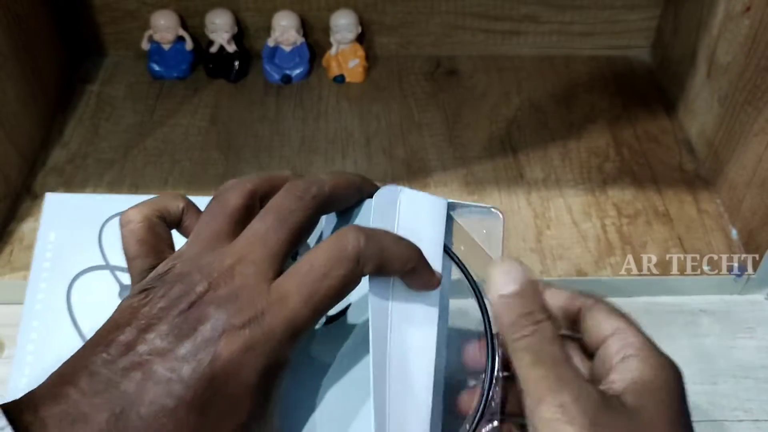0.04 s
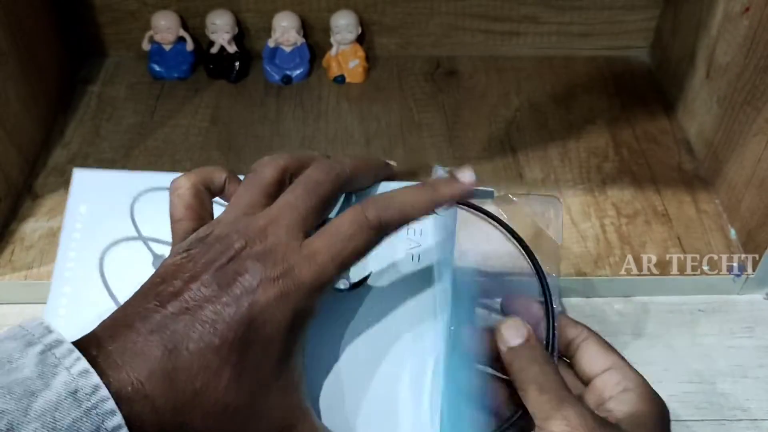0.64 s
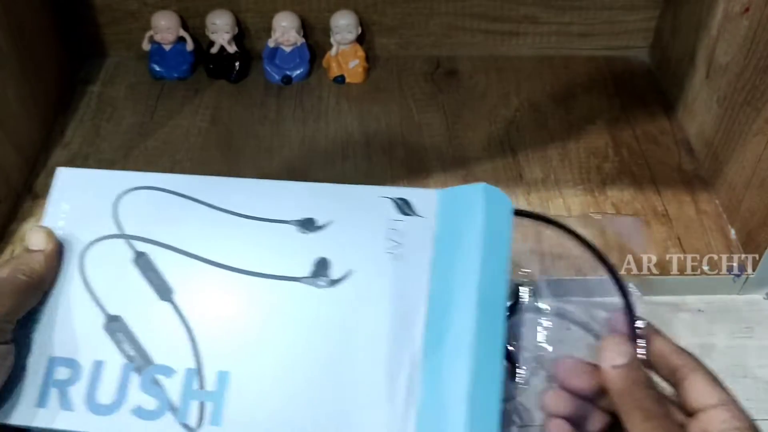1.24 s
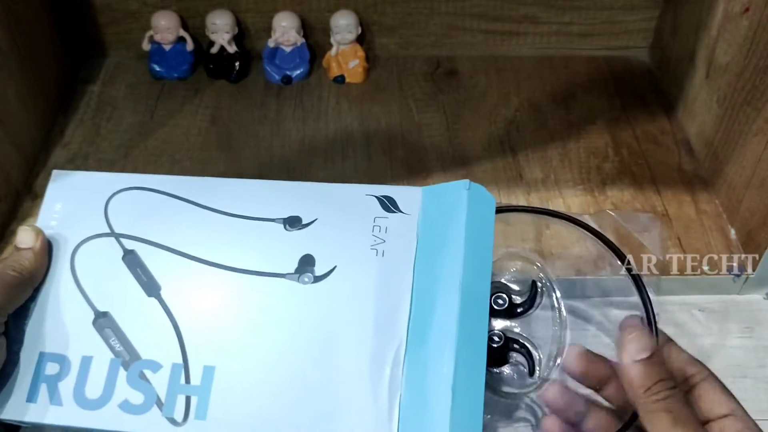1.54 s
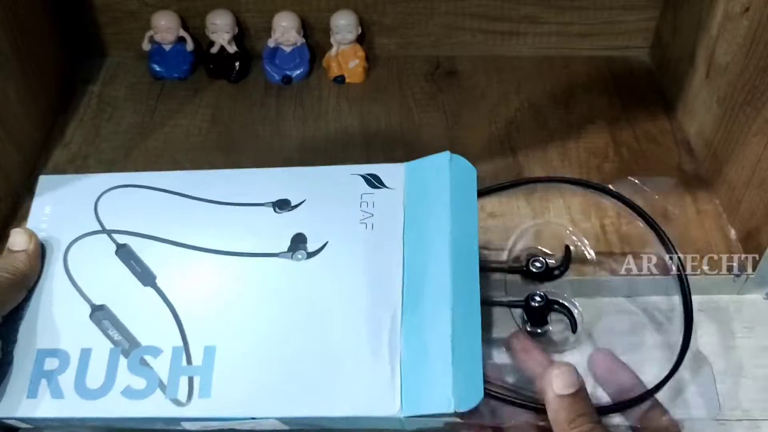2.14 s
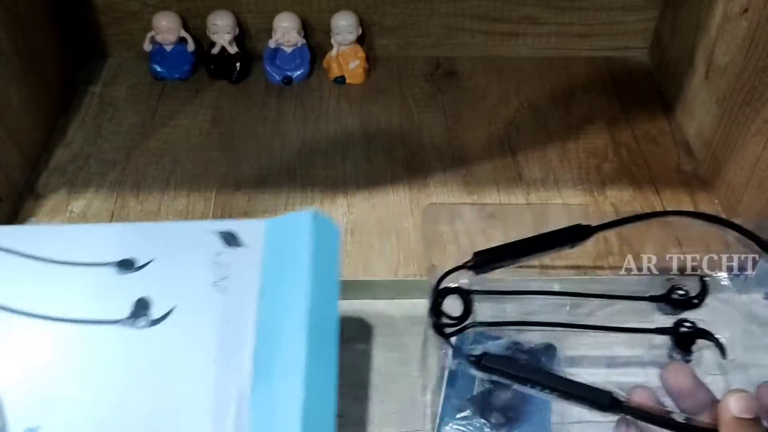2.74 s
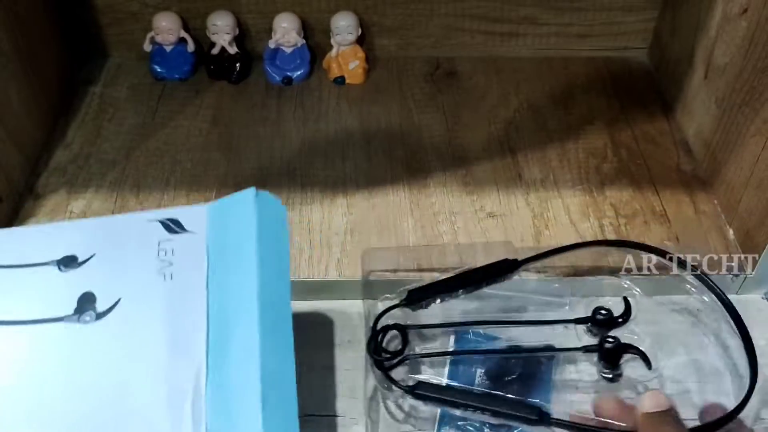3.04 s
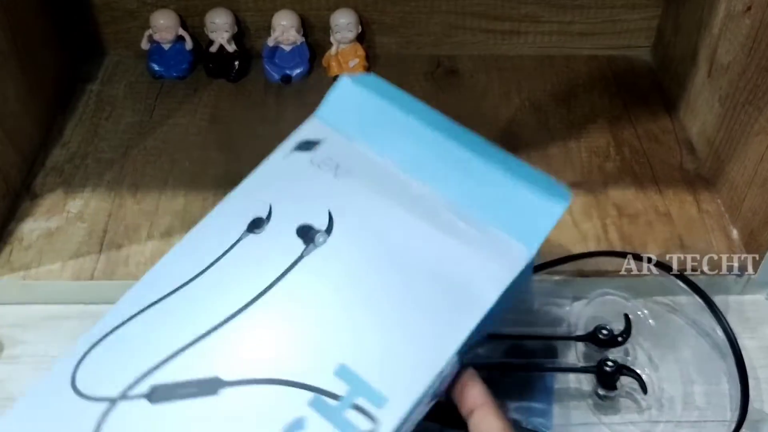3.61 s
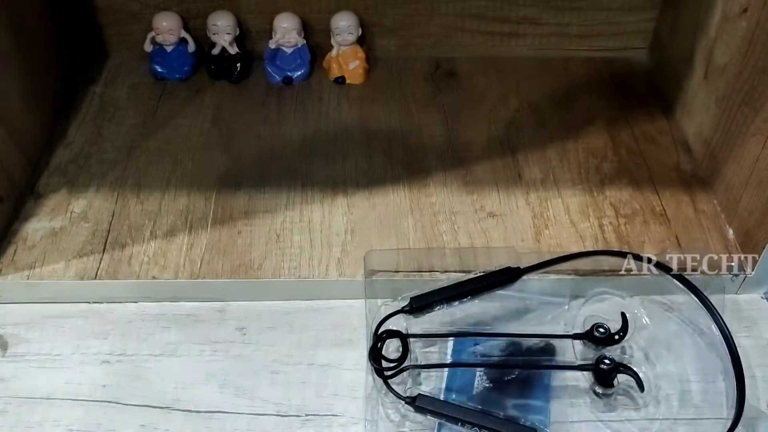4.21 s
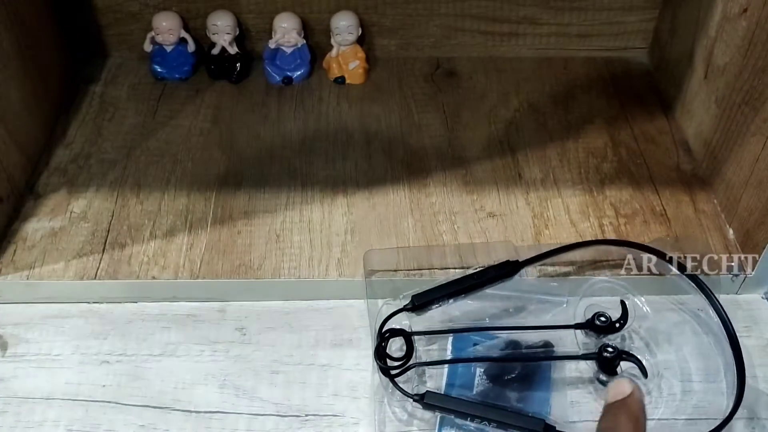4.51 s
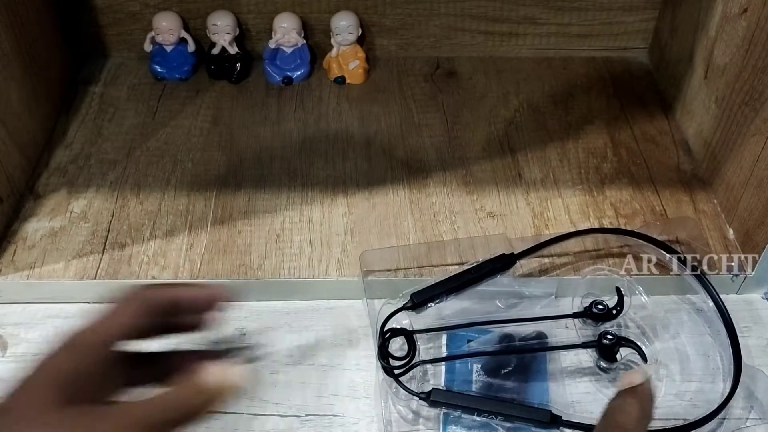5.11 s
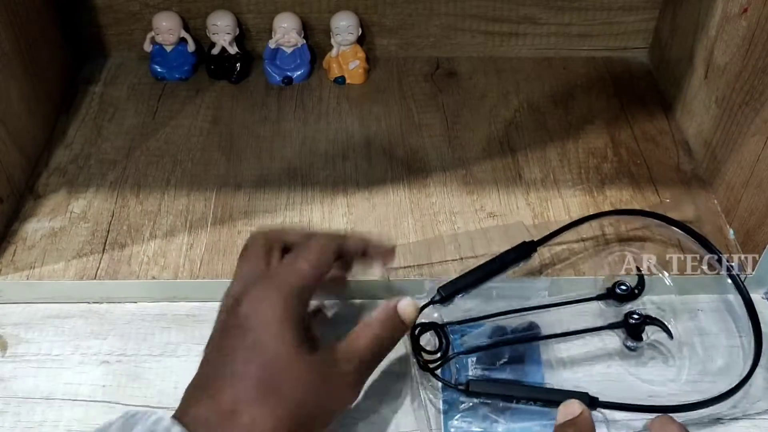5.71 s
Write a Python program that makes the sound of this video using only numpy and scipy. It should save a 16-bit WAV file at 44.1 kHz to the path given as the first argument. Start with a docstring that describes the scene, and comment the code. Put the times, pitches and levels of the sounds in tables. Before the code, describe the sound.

A thin plastic tray is pulled from a cardboard sleeve in short, rustling scrapes, snapping dryly as it buckles while the box bumps a wooden shelf. The box is put aside with a low boom, and a cluster of louder knocks and cracks follows. Then fingers shift the tray on the wood with duller scrapes and a few more knocks. Everything is close and slightly hollow, in a small quiet room.

```python
"""A thin plastic tray is pulled from a cardboard sleeve in a wooden alcove, close to a two-port microphone.
First its edges scrape in tiny slips, it buckles and snaps, and the box bumps the shelf.
At 2.5 s the box is put aside with a low boom; the strongest knocks and snaps follow at 3.0-3.3 s.
Then fingers shift the tray on the wood, with duller scrapes and a few more knocks.
Throughout, the alcove rings with hollow resonances; a small quiet room lies behind."""
import sys
import numpy as np
from scipy import signal
from scipy.fft import rfft, irfft, next_fast_len
from scipy.io import wavfile
from scipy.ndimage import uniform_filter1d

SR = 44100
rng = np.random.default_rng(int(sys.argv[2]) if len(sys.argv) > 2 else 0)


def transcribe(signal):
    """Save signal, clipped to [-1, 1], as a 16-bit WAV file at the path in sys.argv[1]."""
    frames = np.atleast_2d(signal).T
    limited = np.clip(frames, -1, 1)
    pcm = np.round(limited * 32767).astype(np.int16)
    wavfile.write(sys.argv[1], SR, pcm)


N = 258063
TIME_S = np.arange(N) / SR
FREQS_HZ = np.fft.rfftfreq(8192, 1 / SR)

# Sliding strokes: 3 x t/s (once sorted: start, fastest, end), level/dB, sharpness/dB (< 0: flat on wood)
SLIDE_STROKES = [(0.257, 0.288, 0.35, -42.5, -3), (0.361, 0.454, 0.5, -34, 5.5),
                 (.7, 0.764, 0.75, -37.5, 3.5), (1.057, 1.085, 1.133, -38.5, -3),
                 (1.174, 1.232, 1.35, -45.5, -2), (1.227, 1.253, 1.426, -33, 6.5),
                 (1.412, 1.465, 1.48, -37, 1), (1.773, 1.801, 1.853, -35, 0.5),
                 (1.837, 1.91, 1.963, -39.5, 4.5), (2.06, 2.096, 2.21, -38, -3),
                 (2.213, 2.211, 2.25, -43.5, -3), (2.268, 2.464, 2.51, -35, 0),
                 (2.49, 2.52, 2.82, -46.5, 2.5), (3.161, 3.212, 3.247, -24.5, -9.5),
                 (3.255, 3.282, 3.433, -27, -10.5), (3.637, 3.772, 3.96, -62, 13.5),
                 (4.417, 4.451, 4.59, -45, -10), (4.614, 4.634, 4.76, -41.5, -9),
                 (4.754, 4.772, 4.9, -52.5, -6), (4.898, 4.96, 5.06, -44.5, -17),
                 (5.287, 5.426, 5.55, -36.5, -8), (5.553, 5.61, 5.86, -45.5, -8.5)]
# Creep of the gripped packaging: start t/s, end t/s, level/dB
GRIP_CREEPS = [(0, 0.851, -49.5), (1.049, 1.68, -52), (1.719, 2.17, -48), (2.28, 2.68, -53.5),
               (3.049, 3.173, -47.5), (4.56, 4.92, -57)]
# Sliding spectrum: f/Hz, level/dB
SLIDE_SPECTRUM = [(40, -42), (130, -11), (230, -8.5), (430, -12), (620, 0), (900, -6), (1250, -9),
                  (2600, -4), (3600, -10), (5500, -20.5), (7500, -17.5), (11000, -24), (15500, -26)]
# Tray buckles: t/s, level/dB, panel f/Hz, ring re crack/dB
TRAY_BUCKLES = [(.073, -43.5, 2960, 6.5), (.118, -29, 1110, -13), (0.556, -37, 2880, -22),
                (0.605, -36.5, 4350, 0.5), (0.71, -33.5, 3370, -5), (1.065, -31.5, 1020, -7.5),
                (1.461, -35.5, 2630, 4), (1.561, -28, 2423, 3), (1.959, -29.5, 2880, -4.5),
                (2.103, -30, 694, -8), (2.552, -32, 710, -3), (2.688, -34.5, 2610, 4.5),
                (3.068, -36.5, 870, -3), (3.182, -31.5, 734, -2), (3.198, -21, 3010, -5.5),
                (3.303, -24, 2223, 5.5), (4.686, -36.5, 505, -6), (5.521, -39, 690, -1)]
# Knocks of box, tray and shelf: t/s, level/dB, hardness/dB (< 0: cushioned), panel f/Hz
PANEL_KNOCKS = [(.205, -41, -5.5, 700), (.65, -33.5, -21, 660), (0.71, -30, -14, 876),
                (.746, -27, -16, 620), (.984, -40, -22, 556), (1.012, -44, -14, 626),
                (1.082, -28.5, -44, 695), (1.114, -29.5, -26, 595), (1.221, -32, -22, 560),
                (1.368, -27.5, -14, 700), (1.46, -37, -8, 900), (2.071, -32, -9, 820),
                (2.553, -30, -12, 684), (2.688, -28, -14, 697), (3.047, -20.5, -26, 675),
                (3.2, -21, -8.5, 700), (3.223, -17.5, -7, 720), (3.301, -8.5, -34.5, 854),
                (3.674, -44, -2, 640), (3.692, -35, -4, 630), (4.93, -38, -14, 650),
                (5.439, -33, -1.5, 730), (5.461, -23.5, -29, 681), (5.616, -40.5, -8.5, 820),
                (5.632, -19.5, -39, 830), (5.763, -32, -53, 800)]
# Crack spectrum: f/Hz, level/dB
CRACK_SPECTRUM = [(60, -30.5), (250, 3.5), (550, -3), (900, 0), (1400, -3), (2500, 0.5), (3600, -7),
                  (5300, -16), (7800, -11.5), (11000, -18), (15500, -18)]
# Soft, short-ringing low bumps of box or shelf: t/s, level/dB, pitch ratio
SOFT_BUMPS = [(0.219, -43, 1.2), (0.648, -33, 1.16), (.742, -30.5, 1.18), (0.809, -38.5, 1.15),
              (1.114, -41.5, .92), (1.222, -36.5, 1.1), (2.459, -34, 1.1), (3.21, -31, 1.26),
              (3.661, -44, 0.826), (3.688, -38, .91), (3.899, -47, 0.79), (4.308, -52.5, 0.824),
              (4.696, -34, 0.96), (4.741, -37, 0.83), (5.204, -48, 1.17), (5.312, -38, 0.94),
              (5.635, -38, 1.17)]
# Modes of box and shelf: f/Hz, level/dB, base t60/s
SHELF_MODES = [(96.3, -10.5, 0.37), (136.9, -1, 0.62), (159, 0, 0.19), (229.3, -14, 0.25),
               (274.6, -21, 0.81), (348, -20, 0.37)]
# Hand position: t/s, left-right/dB
HAND_PAN = [(0, -1), (1.2, 0.5), (2.6, 0), (3.2, 1.5), (3.7, -1.5), (4.8, 1), (5.4, 0.5)]
# Alcove resonances: f/Hz, width/Hz, gain/dB
ALCOVE_MODES = [(378.7, 21, 8), (574, 89, 5), (686.4, 49, 4.5), (784, 37, 0.5), (909, 71, 6.5),
                (1018, 42, 4), (1380, 19, 1.5), (1900, 34, 4.5), (2230, 25.34, -0.5), (2415, 76, 0),
                (2900, 32, 1)]
# Room decay: f/Hz, t60/s
ROOM_DECAY = [(120, 1), (700, 0.51), (2500, 0.46), (6000, 0.43), (15000, 0.33)]
# Room rumble and microphone hiss: f/Hz, level/dB
NOISE_SPECTRUM = [(25, -23), (60, -9), (125, 6.5), (190, -5.5), (300, -6.5), (480, -14.5), (1500, -18.5),
                  (5500, -28), (7100, -22), (9000, -27.5), (15500, -32)]
# Likeness of the two ports: f/Hz, coherence
PORT_COHERENCE = [(130, 0.98), (300, 0.92), (700, 0.54), (1300, 0), (16000, 0)]
# Imbalance of the two ports: f/Hz, left-right/dB
PORT_BALANCE = [(350, -0.5), (700, 5.5), (1290, -2.5), (2400, 3.5), (8100, -0.5), (14000, 4)]


def scrapes(slips_per_s=1600, spread_db=3.0, judder_db=2, judder_hz=90, mirror_s=0.0011, travel_hz=9):
    """Edges slide on card and wood: a hail of tiny slips, bunched by the uneven grip."""
    slips = (rng.random(N) < slips_per_s / SR) * amp(spread_db * np.minimum(rng.exponential(1, N), 5))
    friction = unit(slips * rng.choice([-1., 1.], (2, N))) + 0.77 * rng.standard_normal((2, N))
    friction = ports(friction * amp(judder_db * wander(judder_hz)))
    # The shelf mirrors the moving contact, so the spectral peaks shift.
    delay_s = mirror_s * (1 + 0.35 * wander(travel_hz))
    echo_index = np.round((TIME_S - delay_s) * SR).astype(int)
    friction = friction + 0.6 * friction.take(echo_index, axis=1, mode="clip")
    gains = registers() * amp(lookup(SLIDE_SPECTRUM, FREQS_HZ))
    return sum(np.sqrt(power) * unit(colour(friction, gain)) for power, gain in zip(slide_power(), gains))


def slide_power(swell=0.98, grip_fade_s=0.028, grip_sharp_db=-0.5, rasp_db=-1, fizz_db=-6.5):
    """Power of low rub, mid rasp and top fizz: strokes swell with speed over the grip's faint creep."""
    moves = []
    for *times_s, db, sharp_db in SLIDE_STROKES:
        speed = np.sin(np.pi / 2 * np.interp(TIME_S, np.sort(times_s), [0, 1, 0]))
        moves.append((speed ** swell, db, sharp_db))
    for start_s, end_s, db in GRIP_CREEPS:
        inside_s = np.minimum(TIME_S - start_s, end_s - TIME_S)
        moves.append((np.clip(inside_s / grip_fade_s + 0.5, 0, 1), db, grip_sharp_db))
    power = np.zeros((3, N))
    for envelope, db, sharp_db in moves:
        band_db = np.array([[0], [rasp_db + 0.52 * sharp_db], [fizz_db + sharp_db]])
        power += (envelope * amp(db + band_db)) ** 2
    return power


def snaps():
    """The tray buckles with a dry, bright crack; the patch that gives way adds its note."""
    out = np.zeros((2, N))
    for t_s, db, panel_hz, ring_db in TRAY_BUCKLES:
        snap = panel(panel_hz, t60_s=0.042, crack_db=0, ring_db=ring_db, treble_db=-0.5, width_hz=560)
        add(out, t_s, amp(db) * snap)
    return out


def knocks(ref_t60_s=0.043, ref_db=-28.5, doubling_db=26.5):
    """Hollow knocks: hardness adds crack and treble, strength lengthens the rattle."""
    out = np.zeros((2, N))
    for t_s, db, hard_db, panel_hz in PANEL_KNOCKS:
        t60_s = ref_t60_s * 2 ** ((db - ref_db) / doubling_db)
        knock = panel(panel_hz, t60_s, crack_db=1 + 0.48 * hard_db, ring_db=0,
                      treble_db=hard_db, width_hz=620)
        add(out, t_s, amp(db) * knock)
    return out


def panel(panel_hz, t60_s, crack_db, ring_db, treble_db, width_hz, note_t60_s=0.036, rise_s=0.0026):
    """A buckled or struck panel: a crack of dense modes, a shorter treble snap and its own note."""
    t = np.arange(SR // 5) / SR
    low, middle, top = registers() * amp(lookup(CRACK_SPECTRUM, FREQS_HZ))
    attack = 1 - np.exp(-t / rise_s)
    decay_db = -60 * t / t60_s
    chatter = port_noise(len(t)) * attack
    crack = peaked(colour(chatter * amp(decay_db), amp(-6) * low + middle))
    treble = peaked(colour(chatter * amp(decay_db / 0.82), top))
    # Neighbouring modes crowd round the note.
    detuning = panel_hz / width_hz * (FREQS_HZ / panel_hz - panel_hz / (FREQS_HZ + 1))
    clatter = peaked(colour(port_noise(len(t)) * amp(decay_db), 1 / (1 + detuning ** 2)))
    port_phase_rad = np.array([[0.38], [0]])
    note = peaked(np.sin(2 * np.pi * panel_hz * t + port_phase_rad) * amp(-60 * t / note_t60_s) * attack)
    ring = amp(-7) * note + amp(-1) * clatter
    return amp(crack_db) * crack + amp(ring_db) * ring + amp(treble_db) * treble


def bumps(boom_s=2.546, boom_db=-19.5):
    """One low boom rings freely; the other bumps die away quickly."""
    out = np.zeros((2, N))
    add(out, boom_s, amp(boom_db) * boom(t60_ratio=0.82, pitch_ratio=1))
    for t_s, db, pitch_ratio in SOFT_BUMPS:
        add(out, t_s, amp(db) * boom(t60_ratio=0.39, pitch_ratio=pitch_ratio))
    return out


def boom(t60_ratio, pitch_ratio, rise_s=0.0043, thud_t60_s=0.26, base_thud_hz=250):
    """A soft blow excites low modes of box or shelf; the shorter the ring, the more thud."""
    t = np.arange(SR * 3 // 4) / SR
    push = 1 - np.exp(-(t / rise_s) ** 2)
    modes = np.zeros(len(t))
    for hz, db, t60_s in SHELF_MODES:
        envelope = amp(db - 60 * t / (t60_s * t60_ratio))
        modes += envelope * np.sin(2 * np.pi * (hz * pitch_ratio * t + rng.random()))
    puff = port_noise(len(t)) * amp(-60 * t / thud_t60_s)
    f_ratio = FREQS_HZ / (base_thud_hz * pitch_ratio)
    thud = colour(puff * push, f_ratio ** 2 / (1 + f_ratio ** 5))
    return peaked(modes[None] * push) + amp(-13) / t60_ratio * peaked(thud)


def alcove(x, through_db=-2, walls_db=-7, walls_t60_s=0.12, room_db=-10.5):
    """Close wooden walls resonate and reflect at once; the room follows."""
    peaks_db = sum(db / (1 + (2 * (FREQS_HZ - hz) / width_hz) ** 2) for hz, width_hz, db in ALCOVE_MODES)
    direct = colour(x, amp(peaks_db + through_db))
    walls = reflections(direct, [(100, walls_t60_s), (16000, walls_t60_s)], delay_s=0.002)
    room = reflections(direct, ROOM_DECAY, delay_s=0.009)
    return direct + amp(walls_db) * walls + amp(room_db) * room


def reflections(x, decay_table, delay_s):
    """Diffuse echoes of x; each band decays at its own rate."""
    hz, t, spectrum = signal.stft(port_noise(SR * 3 // 4), SR, nperseg=256)
    decay = amp(-60 * t / lookup(decay_table, hz)[:, None])
    tail = signal.istft(spectrum * decay, SR, nperseg=256)[1]
    tail = np.pad(tail, ((0, 0), (round(delay_s * SR), 0)))
    return signal.fftconvolve(x, tail / np.linalg.norm(tail[0]), axes=1)[:, :N]


def room_noise(level_db=-57.5):
    """Steady room rumble and faint microphone hiss."""
    return amp(level_db) * unit(colour(port_noise(N), amp(lookup(NOISE_SPECTRUM, FREQS_HZ))))


def ports(pair):
    """Two unrelated signals become a port pair: alike in the bass, unrelated in the treble."""
    size = next_fast_len(pair.shape[1])
    a, b = rfft(pair, size)
    coherence = lookup(PORT_COHERENCE, np.fft.rfftfreq(size, 1 / SR))
    mid = a * np.sqrt((1 + coherence) / 2)
    side = b * np.sqrt((1 - coherence) / 2)
    return irfft(np.array([mid + side, mid - side]), size)[:, :pair.shape[1]]


def port_noise(samples):
    """White noise at the two ports."""
    return ports(rng.standard_normal((2, samples)))


def registers(crossovers_hz=(1400, 4500)):
    """Low, middle and top band gains; powers sum to 1."""
    low, below_top = (1 / (1 + (FREQS_HZ / hz) ** 8) for hz in crossovers_hz)
    return np.sqrt([low, (1 - low) * below_top, 1 - below_top])


def colour(x, gain):
    """Minimum-phase filter; gain given on FREQS_HZ."""
    log_gain = np.log(np.maximum(np.r_[gain, gain[-2:0:-1]], 1e-5))
    response = np.exp(np.conj(signal.hilbert(log_gain)))[:len(gain)]
    taps = irfft(response)[:len(gain)]
    return signal.fftconvolve(x, taps[None], axes=1)[:, :x.shape[1]]


def wander(hz):
    """Random curve of rms 1, hz breakpoints a second."""
    return unit(np.interp(TIME_S * hz, np.arange(N), rng.standard_normal(N)))


def lookup(table, hz):
    """Interpolates a table over log frequency."""
    table_hz, values = np.transpose(table)
    return np.interp(np.log(hz + 1), np.log(table_hz + 1), values)


def add(mix, t_s, sound):
    """Mixes in a stereo sound at t_s."""
    part = mix[:, round(t_s * SR):][:, :sound.shape[1]]
    part += sound[:, :part.shape[1]]


def amp(db):
    """dB to amplitude."""
    return 10 ** (np.asarray(db) / 20)


def unit(x):
    """Scales to rms 1."""
    return x / np.sqrt(np.mean(x ** 2) + 1e-20)


def peaked(x):
    """Scales the loudest 4 ms to rms 1."""
    return x / np.sqrt(uniform_filter1d((x ** 2).mean(0), 176).max() + 1e-20)


def scene():
    """Handling sounds follow the hands and ring in the alcove, over shelf booms and room noise."""
    pan_db = np.interp(TIME_S, *np.transpose(HAND_PAN))
    pan = amp([pan_db / 2, -pan_db / 2])
    left, right = alcove(pan * (scrapes() + snaps() + knocks()))
    balance_db = lookup(PORT_BALANCE, FREQS_HZ)
    left = colour(left[None], amp(balance_db / 2))
    right = colour(right[None], amp(-balance_db / 2))
    return np.vstack([left, right]) + bumps() + room_noise()


def record(dry):
    """Recorder band limit: low-pass at 15750 Hz."""
    taps = signal.firwin(301, 15750, window=("kaiser", 9), fs=SR)
    return signal.oaconvolve(dry, taps[None], "same")


dry = scene()
out = record(dry)
transcribe(out)
```